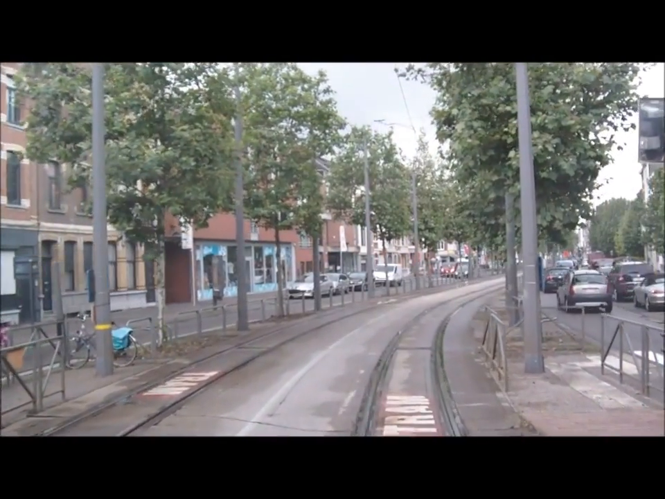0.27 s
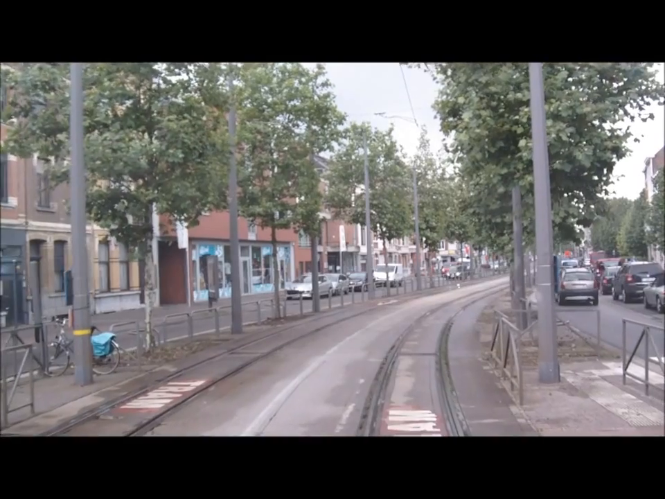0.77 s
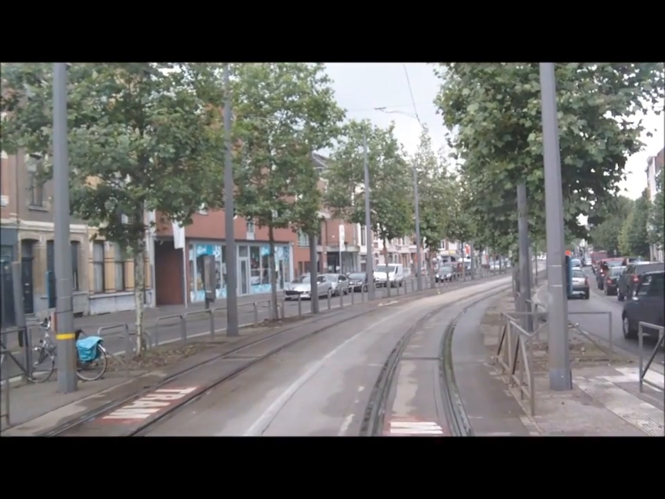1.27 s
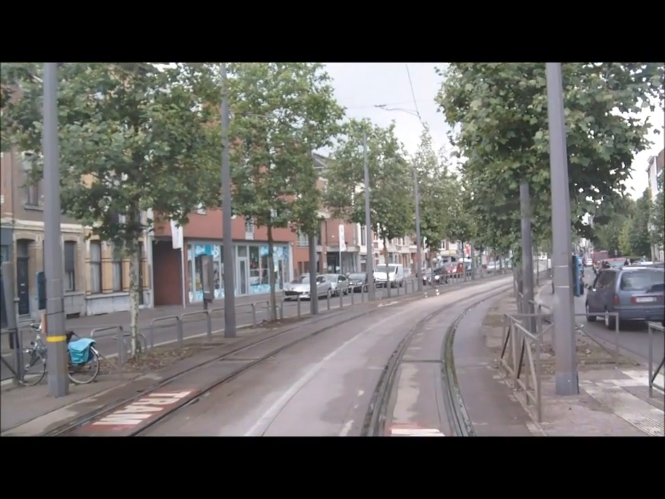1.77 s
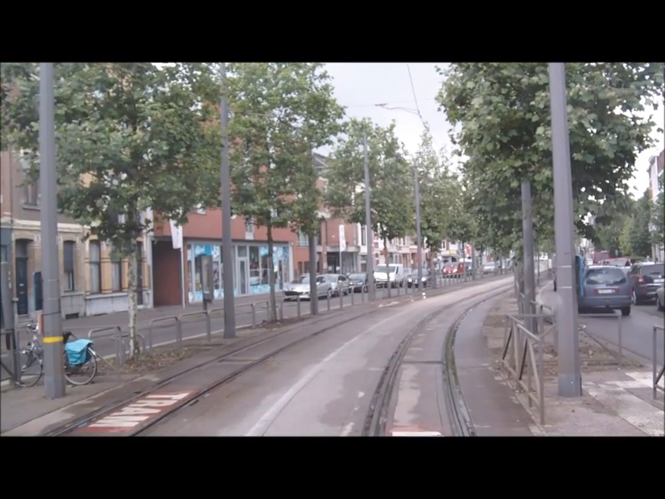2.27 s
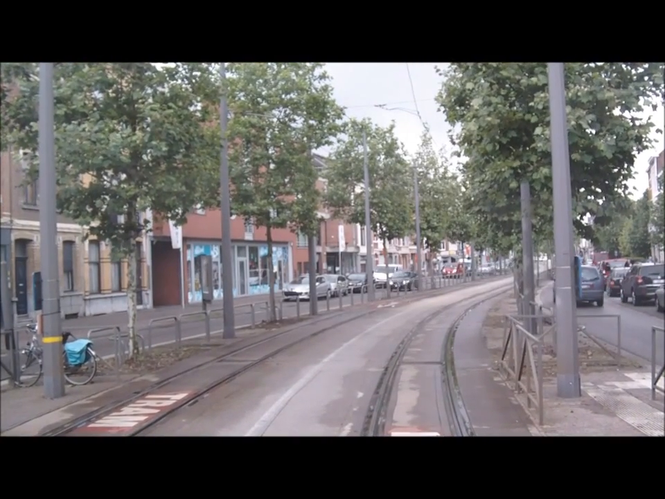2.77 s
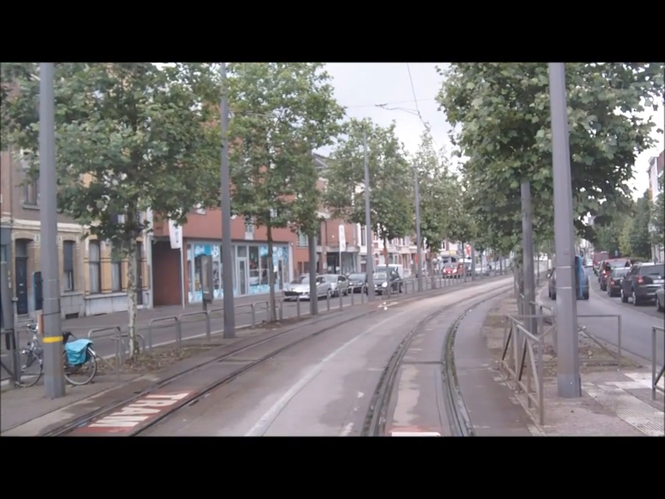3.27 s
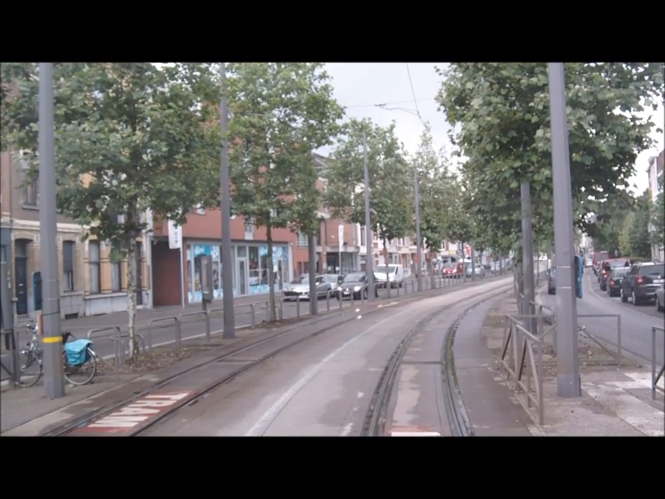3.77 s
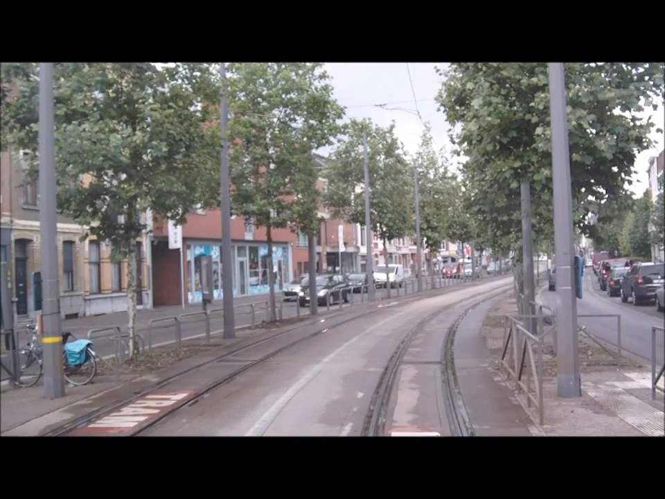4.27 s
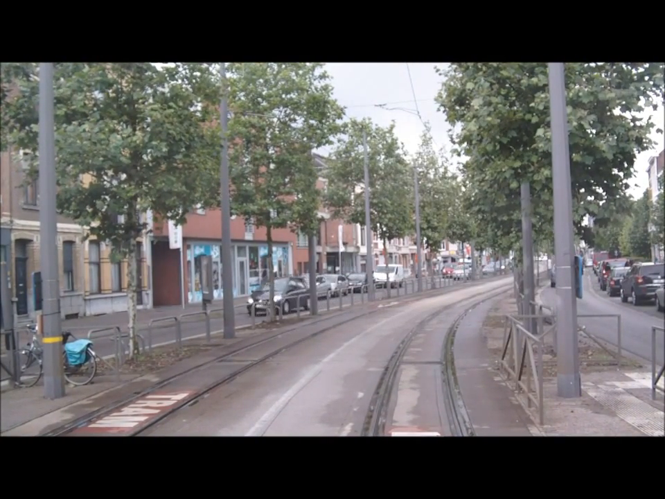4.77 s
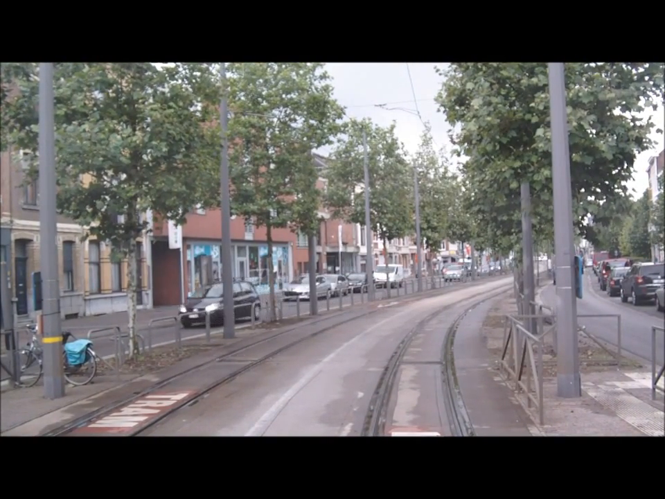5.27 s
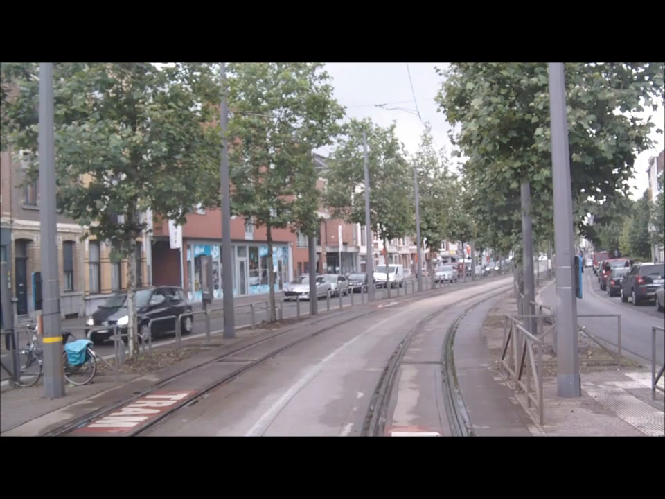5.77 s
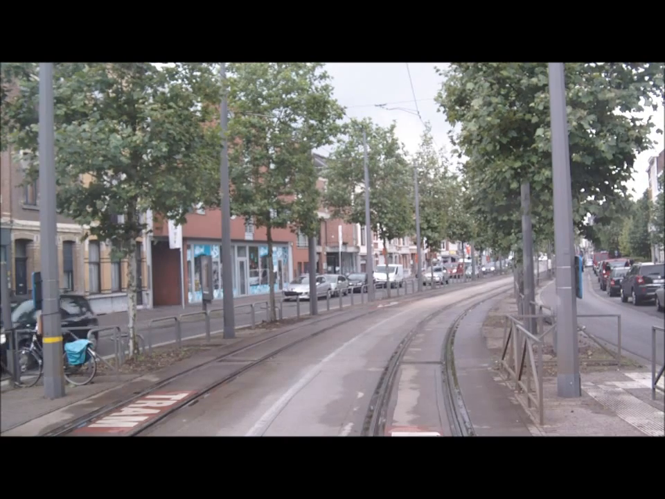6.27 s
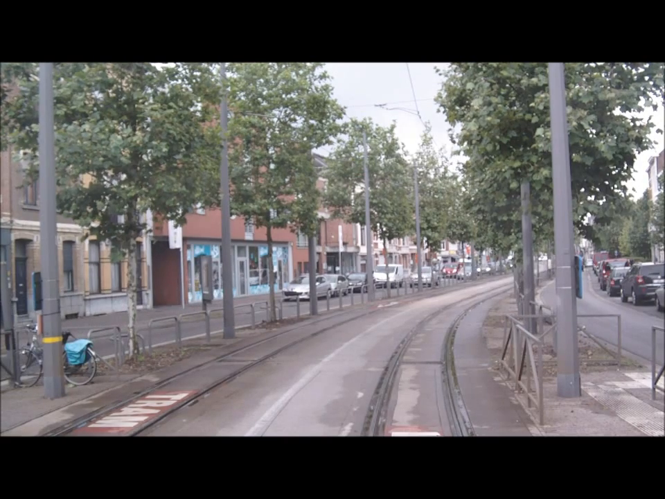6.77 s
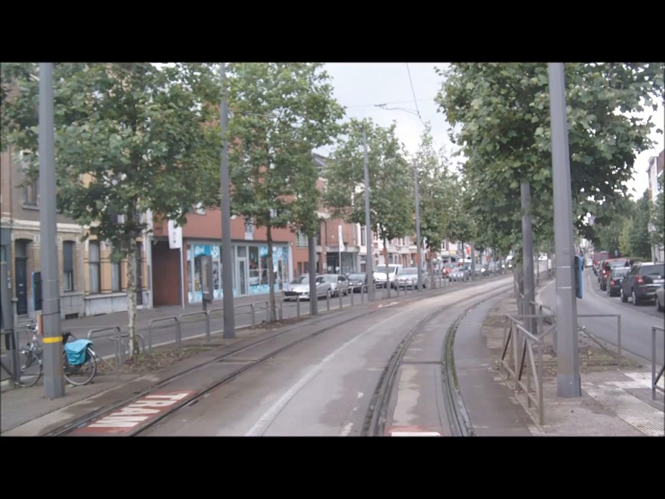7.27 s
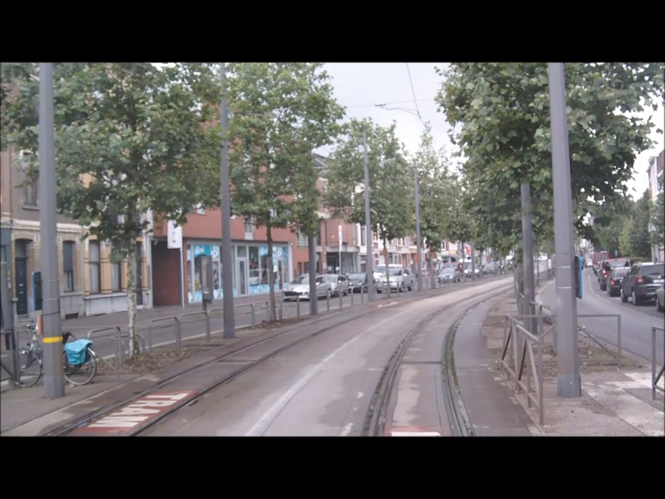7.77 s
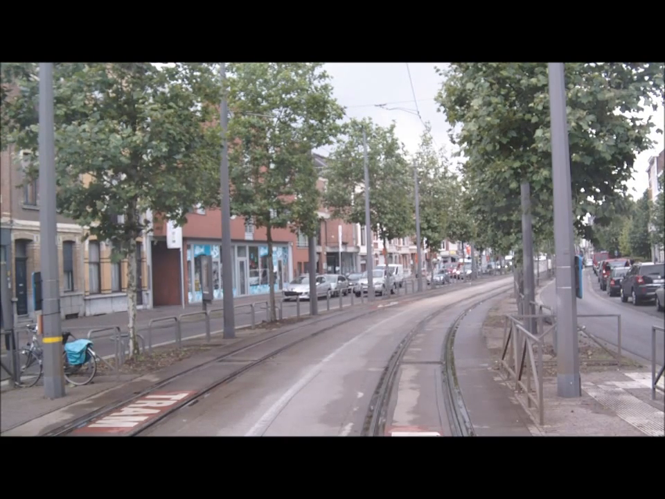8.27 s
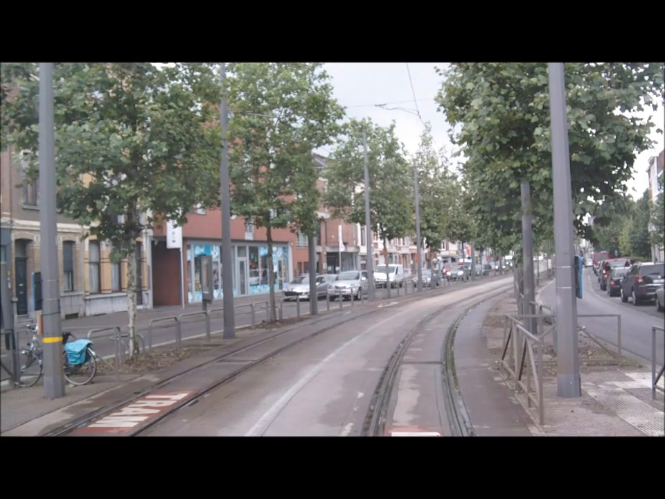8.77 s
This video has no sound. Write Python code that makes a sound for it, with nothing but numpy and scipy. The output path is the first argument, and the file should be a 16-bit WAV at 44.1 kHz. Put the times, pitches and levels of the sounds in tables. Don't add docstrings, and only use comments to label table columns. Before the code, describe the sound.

A tram brakes to a halt: short falling whine with buzzing, then droning hum, floor thumps, one hard knock, shoe scuffs and faint traffic.

```python
import sys
import numpy as np
from scipy import signal
from scipy.fft import rfft, irfft, next_fast_len
from scipy.io import wavfile
from scipy.ndimage import uniform_filter1d, map_coordinates

SR = 44100
rng = np.random.default_rng(int(sys.argv[2]) if len(sys.argv) > 2 else 0)


def pcm_store(signal):
    levels = np.round(np.clip(np.atleast_2d(signal), -1, 1) * 32767)
    wavfile.write(sys.argv[1], SR, levels.astype(np.int16).T)


def boost_factor(decibels):
    exponent = np.asarray(decibels, float) / 20
    return 10 ** exponent


N = 397341
T = np.arange(N) / SR


def unit(x):
    return x / np.sqrt(np.mean(x ** 2) + 1e-20)


def along(points, hz):
    f, v = np.transpose(points)
    return np.interp(np.log(hz + 1), np.log(f + 1), v)


def curves(rows):
    s, *cols = np.transpose(rows)
    return [np.interp(T, s, c) for c in cols]


def wobble(rate):
    return map_coordinates(rng.standard_normal(int(N * rate / SR) + 4), [T * rate])


def bump(s, half):
    return np.exp(-.5 * ((T - s) / half) ** 2)


def swell(s, rise, hold, t60):
    t = T - s
    attack = np.sin(np.pi / 2 * np.clip(t / rise, 0, 1)) ** 2
    return attack * boost_factor(-60 * np.clip(t - rise - hold, 0, 9) / t60)


def sides(pan_db):
    return boost_factor(np.array([[pan_db / 2], [-pan_db / 2]]))


def tone(hz, drift, rate):
    return np.sqrt(2) * np.sin(2 * np.pi * np.cumsum(hz * (1 + drift * wobble(rate))) / SR)


def filtered(x, response):
    m = next_fast_len(x.shape[-1] + SR // 4)
    spectrum = rfft(x, m) * response(np.fft.rfftfreq(m, 1 / SR))
    return irfft(spectrum, m)[..., :x.shape[-1]]


# f/Hz, likeness (0 to 1)
LIKENESS = [(60, 0.99), (170, 1), (300, 0.99), (630, 0.93), (1390, 0.78), (3060, 0.28), (6710, 0.01),
            (14700, 0.032)]


def rush(spectrum, patchy_db, near=0):
    z = signal.stft(rng.standard_normal((2, N)), nperseg=512)[2]
    patches = uniform_filter1d(rng.standard_normal(z.shape[1:]), size=6, axis=0)
    patches = unit(uniform_filter1d(patches, size=12, axis=1))
    pair = signal.istft(z * boost_factor(patchy_db * patches), nperseg=512)[1][:, :N]

    def mid_side(hz):
        turn = np.arccos(np.clip(np.maximum(along(LIKENESS, hz), near), -1, 1)) / 2
        return boost_factor(along(spectrum, hz)) * [np.cos(turn), np.sin(turn)]

    mid, side = filtered(pair, mid_side)
    return unit(np.array([mid + side, mid - side]))


# t/s, f/Hz, level/dB
MOTOR = [(0, 462.6, -46), (.1, 437, -40), (.2, 407.6, -46.5), (.3, 390.3, -46), (.4, 372.6, -44),
         (.5, 354, -44), (.58, 347, -64)]


def motor_whine():
    hz, db = curves(MOTOR)
    fade = swell(-1, 1, MOTOR[-1][0], .3)
    return boost_factor(db + 4 * wobble(25)) * fade * tone(hz, drift=.012, rate=30)


# t/s, level/dB
CHOPPER_LEVEL = [(0, -50), (.44, -50), (.52, -62)]
# t/s, peak/dB
CHOPPER_BURSTS = [(.025, -50), (.062, -41), (.097, -48), (.152, -41), (.235, -46), (.293, -46), (.338, -49),
                  (.378, -47), (.417, -42), (.53, -47)]


def chopper():
    hz, half_s, idle_share = 1345, 0.0053, 0.23
    bursts = sum(boost_factor(db - 4) * bump(s, half_s) for s, db in CHOPPER_BURSTS)
    flutter = idle_share * boost_factor(curves(CHOPPER_LEVEL)[0]) + bursts
    return flutter * (tone(hz, drift=0.02, rate=90) + 0.1 * tone(2 * hz, drift=0.0133, rate=84))


# t/s, peak/dB, half length/s
SURGES = [(.05, -49, .1), (0.668, -27, 0.052), (.86, -30, 0.053), (0.986, -26.5, 0.031), (1.604, -36, 0.12),
          (2.01, -33.5, 0.052), (2.23, -24, 0.025), (2.807, -30.5, 0.32), (3.775, -33, 0.071),
          (4.0, -37, 0.055), (4.595, -27.5, 0.038), (4.88, -30, 0.14), (5.255, -32.5, 0.068),
          (5.8, -31.5, 0.073), (6.19, -27, 0.052), (6.593, -30, 0.21), (7.137, -28.5, 0.13),
          (7.444, -29.5, 0.087), (7.81, -34, 0.07), (8.23, -22.5, 0.048), (8.6, -33, 0.057),
          (8.8, -26, 0.019), (8.914, -26, 0.021)]


def compressor():
    idle = boost_factor(-54 + 2.7 * wobble(8))
    surges = sum(boost_factor(db) * bump(s, half) for s, db, half in SURGES)
    return (idle + surges) * tone(64.7, drift=0.0603, rate=14)


# f/Hz, level/dB
SHAFTS = [(27.5, -45), (40.5, -38), (108, -43.5), (158, -48), (172, -47), (181, -44), (212, -44),
          (242, -57.5), (278, -52), (315, -54.5)]


def shafts():
    return sum(boost_factor(db + 2.3 * wobble(3.7)) * tone(hz, drift=0.0199, rate=5) for hz, db in SHAFTS)


# f/Hz, level/dB
FAN_TONES = [(6799, -80), (7650, -60), (7900, -101), (10304, -84)]
# t/s, level/dB
FAN_LEVEL = [
    (.4, -22),
    (.6, -13),
    (2, -13),
    (5, -15),
    (9.01, -23),
]


def fans():
    tones = sum(boost_factor(db + 2.5 * wobble(5)) * tone(hz, drift=0.002, rate=40) for hz, db in FAN_TONES)
    return boost_factor(curves(FAN_LEVEL)[0]) * tones * sides(2.2)


# t/s, level/dB, weight/dB, brightness/dB, length/s
SOLE_DRAGS = [(0.425, -62, -7, 7, 0.048), (1.556, -54, -11, 8, 0.19), (1.736, -49.5, 3, 7.5, 0.098),
              (1.933, -39, -4.5, 6, 0.11), (2.206, -57.5, 10.5, 6, 0.15), (2.392, -72, -13.5, 19, 0.063),
              (2.595, -51, 2, -8, .024), (2.613, -44, 6.5, 4, 0.05), (2.958, -50.5, -11, 5, 0.12),
              (3.21, -46.5, -8, 6.5, 0.063), (3.606, -59, -3, 9, 0.096), (4.018, -53, 2, 7, 0.024),
              (4.424, -56.5, 5.5, 5, 0.042), (4.579, -41, 2, 5, 0.058), (5.028, -52.5, -4, 2, 0.018),
              (5.4, -53.5, 10, 4, 0.032), (5.69, -55, -14, 6, .103), (5.895, -57, 12.5, -6, 0.033),
              (6.2, -57, -2, 8, .071), (6.543, -54, 4, 6, 0.071), (6.788, -51.5, -0.5, 5, 0.1),
              (7.146, -59, -12, 6, 0.048), (8.052, -52.5, -6, 6, 0.033)]
# t/s, level/dB, weight/dB, brightness/dB, length/s
SOLE_SLAPS = [(2.873, -41, 9.5, 0, 0.028), (4.046, -48.5, -16, 8, 0.012), (5.27, -53.5, 4.5, 2, 0.068),
              (5.647, -45.5, -14, 7.5, 0.018), (5.945, -47.5, -25, 14, 0.022), (6.477, -56.5, 0, 1, .016),
              (7.928, -60, -11, 3, .028), (8.014, -41, 4.5, 4.5, 0.034)]
# f/Hz, level/dB per Hz
WEIGHT_COLOUR = [(250, -120), (400, -13), (900, 1), (1500, -5), (2300, -3), (3500, -18.5), (5000, -11.5),
                 (8000, -120)]
FRICTION_COLOUR = [(1500, -120), (2500, 2), (3500, 5), (5000, 3), (7000, 5), (8500, 6), (10000, 2),
                   (12000, -120)]
DRY_COLOUR = [(6500, -120), (8000, -14), (9500, 1), (11000, 8), (12500, -0.5), (13800, -2), (14800, 0),
              (15500, -120)]


def scuffs():
    s, db, weight_db, bright_db, length = np.transpose(SOLE_DRAGS + SOLE_SLAPS)
    dragged = np.arange(len(s)) < len(SOLE_DRAGS)
    rise = np.where(dragged, 0.58 * length, 0.01)
    t60 = np.where(dragged, 0.31, .2)
    strokes = np.array([swell(*stroke) for stroke in zip(s, rise, np.abs(length - rise), t60)])
    levels = db + weight_db, db, db + bright_db - 12.5
    parts = zip(levels, (WEIGHT_COLOUR, FRICTION_COLOUR, DRY_COLOUR))
    rub = sum((boost_factor(level) @ strokes) * rush(colour, patchy_db=.9, near=.3) for level, colour in parts)
    return boost_factor(.8 * wobble(200)) * sides(-.5) * rub


# t/s, peak/dB, f/Hz, rise/s, t60/s
FLOOR_FLEXES = [(2.173, -18.5, 202, 0.015, 0.2), (2.168, -30, 380, 0.02, .3), (2.245, -20, 191.4, .01, .2),
                (2.29, -23.5, 199, .01, 0.18), (2.188, -7.5, 88, 0.05, 0.09), (2.365, -24, 196, 0.019, .2),
                (2.279, -14, 106, 0.014, 0.11), (2.374, -14, 90, 0.02, 0.2), (2.405, -21, 38, 0.025, 0.2),
                (2.559, -19, 76, 0.01, 0.17), (2.641, -16, 219, .005, 0.097),
                (2.661, -12, 229, 0.0034, 0.099), (2.661, -18, 429, 0.0046, 0.2),
                (2.686, -20, 300, 0.0054, 0.18), (2.688, -18, 120, 0.01, 0.13),
                (2.799, -21.5, 76, 0.044, 0.31), (3.063, -8.5, 164, 0.0045, 0.12),
                (3.09, -14, 347, 0.0085, 0.15), (3.165, -21, 198, 0.0065, 0.17),
                (3.092, -13, 156, .005, .2), (3.11, -11, 207, 0.005, 0.077),
                (3.145, -16, 221.5, .005, 0.15), (3.2, -23, 239, 0.023, 0.2), (8, -28, 28, 0.02, .24),
                (7.993, -21, 190, 0.0037, 0.085), (8.004, -26, 562, .006, .12),
                (8.025, -25, 670, 0.0053, 0.11), (8.012, -24.5, 141, .01, 0.28),
                (8.811, -24, 157.5, 0.02, 0.17), (8.863, -20, 54.2, 0.039, 0.16)]
# t/s, peak/dB, f/Hz, t60/s
PLATE_JOLTS = [(2.162, -34, 430, 0.35), (2.218, -28, 400, 0.39), (2.282, -32.5, 404, .35),
               (2.334, -38, 376, 0.26), (2.39, -35.5, 372, 0.17), (2.47, -30, 260, 0.8),
               (2.64, -19, 255.4, 0.38), (2.65, -21.5, 400, 0.35), (2.655, -34.5, 1042, .2),
               (2.882, -25, 347, 0.27), (4.022, -42, 950, 0.14), (4.039, -40, 906, 0.18),
               (4.058, -48, 910, .12), (4.062, -35, 438, 0.24), (5.192, -35, 376, 0.21),
               (5.9, -38.5, 441, 0.19), (7.988, -29, 522, 0.18), (7.991, -29.5, 1114, 0.36),
               (8.005, -23, 190, 0.36), (8.02, -32, 620, 0.34), (8.16, -43, 475, 0.27),
               (8.71, -39, 477, 0.59)]


def thumps():
    out, n = np.zeros(N), SR // 2
    flexes = [(s, db, hz, rise, t60, 0.03) for s, db, hz, rise, t60 in FLOOR_FLEXES]
    jolts = [(s, db, hz, 0.017, t60, 0.61) for s, db, hz, t60 in PLATE_JOLTS]
    for s, db, hz, rise, t60, noisy in flexes + jolts:
        i = round(s * SR)
        grit = lambda f: 0.077 * (f > hz) / (1 + (f / 1300) ** 3)
        band = lambda f: 1 / (1 + (1.32 * (f / hz - hz / (f + 1))) ** 4) + grit(f)
        rumble = unit(filtered(rng.standard_normal(n), band)) / np.sqrt(2)
        note = np.sin(2 * np.pi * hz * T[:n])
        blend = np.sqrt(1 - noisy) * note + np.sqrt(noisy) * rumble
        hit = boost_factor(db) * swell(s=0, rise=rise, hold=0, t60=t60)[:n] * blend
        out[i:i + n] += hit[:N - i]
    return out


# t/s, peak/dB
PANEL_BLOW = (3.065, -6)
# f/Hz, level/dB, t60/s
PANEL_MODES = [(208, -9, 0.31), (347, -8, 0.32), (416, -5, 0.43), (631, -5.5, 0.22), (750, -4, 0.14),
               (950, -0.5, 0.092), (1070, -10.5, 0.32), (1524, -16, 0.13), (1055, 11.5, 0.039),
               (1434, -8, 0.076), (2000, -13, 0.079), (1960, -14.5, 0.14)]
# f/Hz, level/dB per Hz
RATTLE_COLOUR = [(80, -120), (130, 4), (350, 2.5), (1000, -8.5), (1500, -15.5), (2500, -26), (4000, -39),
                 (6000, -44), (9000, -120)]


def knock():
    s, db = PANEL_BLOW
    t = np.clip(T - s, 0, 9)
    ring = sum(boost_factor(level - 60 * t / min(t60, .35)) * np.sin(2 * np.pi * hz * t + rng.uniform(0, 8.4))
               for hz, level, t60 in PANEL_MODES)
    rattle = unit(filtered(rng.standard_normal(N), lambda f: boost_factor(along(RATTLE_COLOUR, f))))
    return boost_factor(db) * (0.33 * swell(s, 0.008, 0, 8.2) * ring + 0.25 * swell(s, 0.0053, 0.012, 0.28) * rattle)


# t/s, peak/dB
HEEL_CONTACTS = [(2.879, -38), (2.882, -35), (2.885, -35), (2.888, -27.5), (2.893, -31), (2.897, -40),
                 (2.9, -30), (2.906, -41), (2.916, -45), (2.927, -39)]
# f/Hz, level/dB, t60/s
SILL_MODES = [(996, -10, 0.039), (1310, -9, .03), (1493, -4, 0.041), (2030, -5, 0.023), (2520, -3, .03),
              (3300, -4, 0.026), (3830, -2.5, 0.026), (5030, -10, .015), (5825, -9, 0.022),
              (6988, -16, 0.022), (7950, -13, .02)]


def clacks():
    out, t = np.zeros(N), T[:SR // 8]
    hz, level, t60 = np.transpose(SILL_MODES)[:, :, None]
    for s, db in HEEL_CONTACTS:
        strength, detune = rng.standard_normal((2, len(SILL_MODES), 1))
        fading = boost_factor(db + level + 2.4 * strength - 60 * t / t60)
        modes = fading * np.sin(2 * np.pi * hz * (1 + 0.016 * detune) * t)
        out[round(s * SR):][:len(t)] += (np.sign(strength) * modes).sum(0)
    return out


# t/s, peak/dB, f/Hz, length/s, left-right/dB
GRIT_SCRAPES = [(2.621, -46, 6110, 0.05, -4), (2.628, -39.5, 5800, 0.056, -9),
                (2.882, -43, 3900, 0.046, -6), (2.883, -40.5, 2530, 0.074, -7),
                (2.877, -36, 1460, 0.046, -7), (3.556, -58.5, 10770, 0.043, 11), (5.276, -54, 3900, .02, 0),
                (5.413, -54, 5200, 0.038, -6), (5.42, -54, 3400, .03, -4), (8.02, -51, 3380, .05, -6),
                (5.908, -50, 2020, 0.028, 0), (8.004, -43, 2060, 0.038, -8), (2.876, -47, 7850, .035, 6),
                (3.068, -47, 3300, .05, -3), (3.062, -38, 1400, .03, 0), (5.278, -59, 7000, .04, -6),
                (5.652, -56, 8000, .04, -4), (5.948, -55, 10900, .04, 8), (2.607, -57, 7000, .04, -6),
                (6.628, -54, 3030, .045, -5), (2.622, -40, 1100, .09, 0), (2.927, -44, 1800, .02, 0),
                (3.068, -40, 2300, .06, -2), (2.88, -43, 2200, .05, -4), (2.88, -48, 5600, .04, -6),
                (7.998, -38, 780, .07, 0), (5.905, -49, 1500, .04, 0), (5.955, -54, 7500, .05, -5),
                (4.6, -50, 2200, .06, -3)]


def scrapes():
    def band(hz):
        width_hz = min(.1 * hz, 550)
        return unit(filtered(rng.standard_normal(N), lambda f: 1 / (1 + ((f - hz) / width_hz) ** 2)))

    return sum(boost_factor(db) * swell(s, 0.053 * length, 0.3 * length, 3 * length) * band(hz) * sides(pan_db)
               for s, db, hz, length, pan_db in GRIT_SCRAPES)


# t/s, peak/dB
GRIT_CRACKS = [(4.029, -39), (4.0616, -34), (2.6302, -32), (2.6367, -33), (8.021, -36)]


def ticks():
    noise = rng.standard_normal((2, N)) + rng.standard_normal(N)
    bright = lambda f: 1 / (1 + (3000 / (f + 1)) ** 2) / (1 + (f / 13000) ** 4)
    cracks = sum(boost_factor(db - 16) * swell(s, rise=.002, hold=.001, t60=.02) for s, db in GRIT_CRACKS)
    return cracks * unit(filtered(noise, bright))


# t/s, peak/dB, f/Hz, length/s, left-right/dB
METAL_RINGS = [(2.1, -69, 7700, 0.08, 9), (2.34, -64, 11760, 0.24, 6), (2.08, -68, 13300, .12, 8),
               (3.15, -67, 7850, .1, 9), (3.25, -49, 1130, 0.12, 0), (3.582, -67, 10930, 0.15, 8),
               (5.406, -65, 7967, 0.055, 6), (5.412, -67, 5346, 0.17, -11), (5.445, -64, 3155, 0.16, 0),
               (6.625, -61, 3120, .035, -5), (6.622, -60, 2920, .04, -5), (5.862, -65, 7900, 0.11, -2),
               (8.492, -49.5, 750, 0.2, 3)]


def rings():
    out = np.zeros((2, N))
    for s, db, hz, length, pan_db in METAL_RINGS:
        gain = boost_factor(db + 2.5 * wobble(70)) * swell(s, .02, .65 * length, 1.6 * length)
        out += gain * tone(hz, drift=.0025, rate=50) * sides(pan_db)
    return out


# f/Hz, t60/s
CAB_ECHO = [(200, 0.16), (2000, 0.066), (10000, 0.12)]


def cab(x):
    hz, t, z = signal.stft(rng.standard_normal((2, SR // 2)), SR, nperseg=256)
    tail = signal.istft(z * boost_factor(-60 * t / along(CAB_ECHO, hz)[:, None]), SR, nperseg=256)[1]
    tail = filtered(tail / np.linalg.norm(tail[0]), lambda f: 1 / (1 + (900 / (f + 1)) ** 2))
    delayed = np.pad(x, (200, 0))[None]
    return signal.fftconvolve(delayed, tail, axes=1)[:, :N]


# t/s, lift/dB
BODY_SHAKING = [(0, 2), (.35, 2), (.8, 0.5), (1.25, 3), (2.06, 0), (2.21, 6), (2.4, 0), (2.68, 5.5),
                (3.14, 1), (3.6, -3), (3.96, 1), (4.69, -1), (6.2, 0.5), (6.6, -0.5), (6.85, 1.5),
                (7.8, -0.5), (8.16, 1.5), (9.01, -1)]
# f/Hz, level/dB per Hz
PLATE_COLOUR = [(190, -69), (330, -10), (344, 0), (414, 0), (481, 2), (600, -13.5), (640, -5), (830, -77),
                (1410, -120)]


def wheels():
    halt_s, settle_s = 2, 0.39
    rolling = 1 / (1 + np.exp((T - halt_s) / settle_s))
    level_db = -50 + 4 * rolling + 0.79 * curves(BODY_SHAKING)[0] + 2.8 * wobble(4.8)
    return boost_factor(level_db) * rush(PLATE_COLOUR, patchy_db=0.2)


# t/s, lift/dB, half length/s
SPRING_ROCKING = [(-.1, 14, 0.13), (2.33, 8.5, 0.18), (3.25, -3, .1), (3.55, 4, 0.22), (7.2, 2, .4),
                  (8.4, 4.5, 0.32)]
# f/Hz, level/dB per Hz
SWAY_COLOUR = [(10, -62), (17, -9), (22, -5), (30, 5.5), (45, 5.5), (55, -2.5), (72, -1), (82, -5.5),
               (110, -120)]
BODY_COLOUR = [(41, -47), (70, -4.5), (79, -5), (92, -10), (119, -6.5), (139, -10), (161, -3), (178, -4.5),
               (221, -8.5), (248, -9.5), (270, -19), (316, -18), (340, -22), (440, -60), (750, -120)]


def body(shake):
    sway_db = -34 + sum(db * bump(s, half) for s, db, half in SPRING_ROCKING)
    boom_db = -32.5 + curves(BODY_SHAKING)[0] + 0.54 * shake
    sway = boost_factor(sway_db) * rush(SWAY_COLOUR, patchy_db=-1.5)
    return sway + boost_factor(boom_db) * rush(BODY_COLOUR, patchy_db=0.5)


# t/s, lift/dB
TRAFFIC_LEVEL = [(0, 5), (.3, 2.5), (1.25, 0.5), (2.0, 1), (2.3, -1.5), (2.8, 1), (3.3, 1.5), (3.9, -1),
                 (5.2, 0), (5.9, 2), (6.3, 1), (7.15, 3.5), (8.43, 6), (8.71, 9.5), (9.01, 10)]
# f/Hz, level/dB per Hz
STREET_COLOUR = [(330, -11.5), (560, -8), (682, -5.5), (804, -2.5), (859, 1), (933, -3), (1020, 3),
                 (1150, -1), (1240, -5), (1710, -7.5), (2050, -7), (2790, -16), (4000, -21.5),
                 (5200, -29.5), (8800, -120)]


def street(shake):
    return boost_factor(-48 + curves(TRAFFIC_LEVEL)[0] + .5 * shake) * rush(STREET_COLOUR, patchy_db=0.32)


# t/s, lift/dB, half length/s
VENT_DRAUGHTS = [(0, 1, 0.27), (1.3, -2, .25), (3.596, 2, 0.25), (5.702, 0.5, 0.3), (6.86, 3.5, 0.2),
                 (8.5, -1, .25), (9, 1.5, 0.14)]
# f/Hz, level/dB per Hz
AIR_COLOUR = [(2500, -120), (3500, 1.5), (5000, 5), (7000, 4.5), (9000, 4.5), (11000, 1.5), (12500, -4.5),
              (14000, -6.5), (14900, -8), (15150, -26), (15500, -120)]


def vents():
    draught_db = sum(db * bump(s, half) for s, db, half in VENT_DRAUGHTS)
    level_db = -59.5 + 0.41 * curves(TRAFFIC_LEVEL)[0] + draught_db + 0.61 * wobble(2.81)
    return boost_factor(level_db) * rush(AIR_COLOUR, patchy_db=0.0)


def scene():
    machines = motor_whine() + chopper() + compressor() + shafts() + fans()
    blows = thumps() + knock() + clacks()
    small = scuffs() + scrapes() + ticks() + rings()
    shake = wobble(3.293)
    background = wheels() + body(shake) + street(shake) + vents()
    return machines + blows + boost_factor(-1.0) * cab(blows) + small + background


def top_cut(x):
    return signal.sosfilt(signal.butter(12, 15340, fs=SR, output="sos"), x)


# f/Hz, width/Hz, lift/dB
LEFT_CAVITIES = [(11200, 1700, 10), (13500, 1200, 2.5)]
RIGHT_CAVITIES = [(7250, 1300, 14), (3300, 1600, 2.5)]


def record(dry):
    def port(f, cavities):
        return boost_factor(sum(db / (1 + ((f - hz * hz / (f + 1)) / 2 / width_hz) ** 2)
                       for hz, width_hz, db in cavities))

    ports = lambda f: np.array([port(f, LEFT_CAVITIES), port(f, RIGHT_CAVITIES)]) * (f < 15300)
    x = filtered(dry, ports)
    mix = x / (1 + np.abs(x / .55) ** 4) ** (1 / 4)
    return top_cut(mix)


dry = scene()
out = record(dry)
pcm_store(out)
```